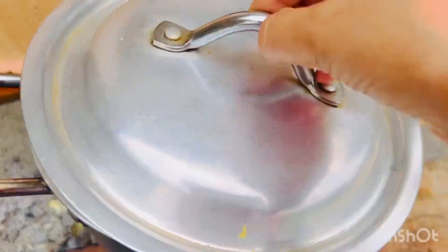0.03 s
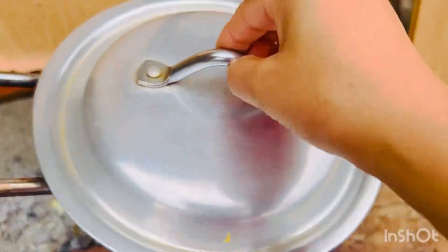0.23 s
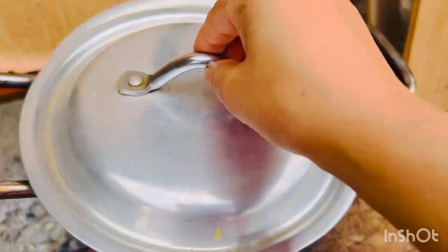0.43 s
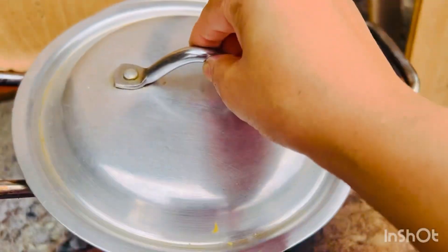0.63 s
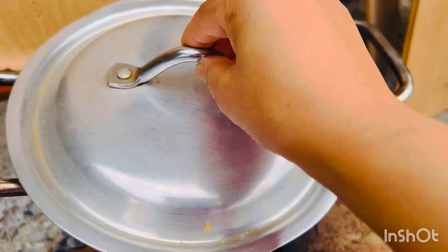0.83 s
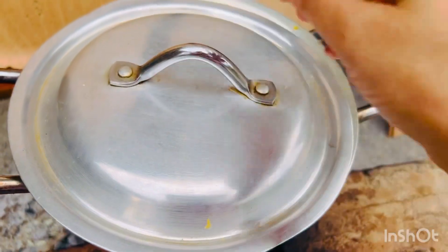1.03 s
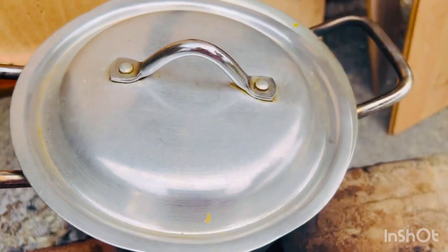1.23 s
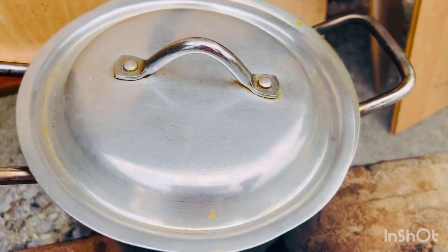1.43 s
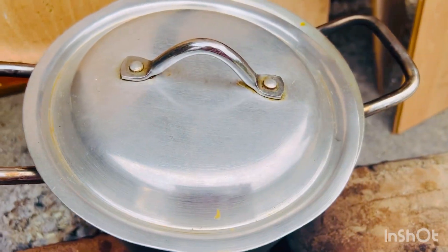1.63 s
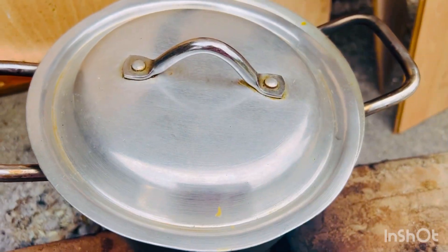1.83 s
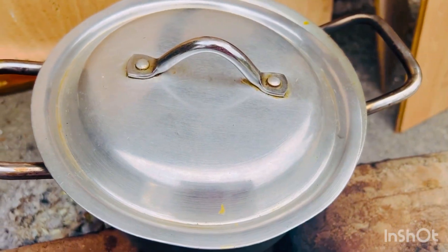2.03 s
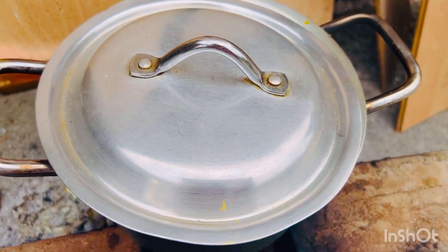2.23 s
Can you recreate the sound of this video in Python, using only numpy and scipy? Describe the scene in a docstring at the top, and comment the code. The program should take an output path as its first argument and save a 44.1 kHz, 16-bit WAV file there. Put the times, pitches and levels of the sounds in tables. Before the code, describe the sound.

Close by, a metal pot lid lands in a quick clatter of ringing clanks and a brief scrape. Softer, duller knocks follow as it settles, leaving a quiet outdoor rumble, light microphone bumps and faint ticks.

```python
"""A lid set on a cooking pot

Outdoors, close to the microphone, a metal lid clanks, bounces, scrapes and seats, then rocks softly.
Each impact excites the lid's strong modes and a dense clash of sheet metal, until the seated rim damps
them. The air in the pot resonates, booming lower as the gap closes. Nearby walls add a weak tail.
Behind it lie a low rumble, a few handling bumps and faint ticks."""
import sys
import numpy as np
from scipy import signal
from scipy.fft import rfft, irfft
from scipy.io import wavfile

SR = 44100
rng = np.random.default_rng(int(sys.argv[2]) if len(sys.argv) > 2 else 0)


def dump_mix(stems):
    """Bounce the given channels to the path in sys.argv[1] as a 16-bit WAV at rate SR."""
    frames = np.atleast_2d(stems).T  # one column per channel
    limited = np.clip(frames, -1, 1)  # hard clip at full scale
    pcm = np.round(limited * 32767).astype(np.int16)
    wavfile.write(sys.argv[1], SR, pcm)


N = 105840

# outdoor background (frequency [Hz], relative spectral density [dB])
RUMBLE_SPECTRUM = [(15, -42.5), (25, -19.5), (47, -3.5), (70, -1), (95, -12.5), (120, -16.5), (200, -23.5),
                   (335, -30), (680, -37.5), (1250, -42), (3000, -55), (6000, -62.5), (9000, -63),
                   (12000, -72.5), (16000, -73)]
# handling bumps (centre time [s], frequency [Hz], level [dB], half-width [s])
HANDLING_BUMPS = [(0.06, 59.7, -29.5, 0.022), (0.135, 65, -28.5, 0.015), (0.185, 65, -28, 0.012),
                  (0.633, 55.9, -31, 0.022), (0.862, 57.8, -28.5, 0.046), (1.56, 59.5, -29, 0.017),
                  (1.932, 60, -28, 0.024), (2.006, 73.2, -21.5, 0.0076), (2.19, 61.6, -32, 0.019),
                  (2.334, 66, -30.5, 0.0081)]
# ticks and scuffs (time [s], level [dB], centre [Hz], bandwidth [Hz], t60 [s])
SCUFFS = [(0.149, -55.5, 4320, 1780, 0.027), (0.384, -21, 4130, 802, 0.057),
          (0.598, -60.5, 7170, 3480, 0.086), (0.745, -61.5, 4425, 1314, 0.068),
          (0.819, -63, 6100, 3001, 0.029), (2.16, -60, 5640, 2400, 0.064), (2.3, -47.5, 3610, 400, 0.031),
          (2.2990, -47, 5640, 3020, 0.028), (2.2990, -40.5, 10900, 12100, 0.033),
          (2.303, -45, 1313, 121, 0.015)]
# rim impacts (time [s], ring level [dB], clash level [dB], treble corner [Hz], contact time [s])
RIM_CONTACTS = [(0.1996, -18.5, -12, 9900, 0.0017), (0.2251, -22.5, -13.5, 5530, .001),
                (0.2418, -54, -32, 5810, .001), (0.2958, -22.5, -13.5, 11810, 0.0011),
                (0.3290, -40, -14, 14350, 0.0081), (0.3603, -26, -23, 6000, 0.0024),
                (0.3728, -25.5, -14, 6600, 0.0011), (0.382, -54.5, -21, 9200, 0.0082),
                (0.4100, -52, -32.5, 7050, 0.0041), (0.455, -53.5, -30, 1181, .002),
                (0.4749, -34.5, -26, 15800, .001), (0.5161, -35, -29, 2480, 0.0026),
                (0.8950, -41.5, -42, 599, 0.0023), (0.9856, -32, -29.5, 1540, 0.0035),
                (1.065, -62, -45, 752, 0.0012), (1.2195, -61.5, -54, 1098, 0.0011),
                (1.2679, -63.5, -52.5, 1199, .001)]
# strong modes of lid and pot (frequency [Hz])
LID_MODE_HZ = [852, 1070, 1284, 1717, 2245, 2697, 2944, 2987, 3090, 3546, 3840, 3923, 4599, 4887, 5965,
               7160, 7860]
# response of each strong mode (level when loose [dB], level when seated [dB], t60 [s])
LID_MODE_RESPONSE = [(-7, -13.5, 0.13), (-11.5, 2, 0.041), (-13.5, 0, .11), (-5, -7, .17), (-17, -9, .16),
                     (-9.5, -6.5, .22), (0, -24, 0.22), (-13, -11, .25), (-2, -4.5, 0.36), (-0.5, -10, 0.3),
                     (-13.5, -11.5, .3), (-9.5, -19, 0.37), (-11, -7, 0.34), (-7.5, -14, .33),
                     (-11.5, -11, .16), (-14, -11.5, 0.15), (-11, -22, .11)]
# crowded modes of the sheet metal (frequency [Hz], relative spectral density [dB])
SHEET_SPECTRUM = [(150, -9), (400, -2.5), (700, -5), (950, -1), (1800, -5), (2500, -4.5), (3300, -4),
                  (4300, -9.5), (5500, -12), (6600, -16), (8500, -9.5), (10100, -24), (11500, -8.5),
                  (13700, -14.5), (15200, -10), (17000, -24)]
# decay of those modes (frequency [Hz], t60 [s])
SHEET_DECAY = [(200, 0.072), (1200, 0.0659), (4000, 0.13), (8000, 0.13), (15000, 0.092)]
# air pumped in the pot (time [s], frequency [Hz], level [dB], swell [s], t60 [s])
AIR_BOOMS = [(0.201, 529, -12.5, 0.037, 0.04), (0.296, 451, -12.5, 0.0026, 0.074),
             (0.330, 409, -23, 0.0043, 0.087), (0.362, 475, -19.5, 0.0029, 0.03),
             (0.371, 402.5, -15.5, 0.0071, 0.07), (0.4549, 407.3, -28.5, .005, 0.075),
             (0.478, 332.5, -16.5, 0.0115, 0.0279), (0.612, 341.8, -45, .008, 0.067),
             (0.896, 351, -22.5, 0.0021, 0.058), (0.9872, 356, -15, 0.0019, 0.052),
             (1.065, 350, -29, 0.0036, 0.054), (1.269, 338, -45, 0.0034, 0.054)]
# level difference at the microphone's two ports (frequency [Hz], left over right [dB])
PORT_BALANCE = [(100, 0.5), (400, 3), (1300, 6), (2500, 7.5), (4500, 3.5), (8000, 2), (12000, -1)]
# phase difference at the ports (frequency [Hz], lag of the right [rad])
PORT_LAG = [(100, 0.26), (380, 0.33), (550, -0.35), (1300, .1), (2000, -.3), (2700, 1), (3600, 1),
            (4900, -0.59), (6000, -.1), (7900, 0.19)]

SEATED_S, SEATED_T60_S = .465, 0.19  # from then on the rim adds this damping
PORT_SPREAD_HZ = 7500  # above this the two ports hear different phases
TOP_HZ = 16500
SIDES = np.array([[1], [-1]])  # left, right


def undb(db):
    """Amplitude ratio of a level in decibels."""
    return 10 ** (np.asarray(db) / 20)


def curve_at(points, hz):
    """Interpolation of (frequency [Hz], value) points on a logarithmic frequency axis."""
    knots_hz, values = np.array(points, float).T
    return np.interp(np.log(np.maximum(hz, 1)), np.log(knots_hz), values)


def fade(t, t60):
    """Exponential decay: unity until t = 0, then 60 dB down every t60."""
    return np.exp(-np.log(1000) * np.maximum(t, 0) / t60)


def add(out, start, sound):
    """Superposition of a sound from a start time on."""
    i = int(start * SR)
    out[..., i:i + sound.shape[-1]] += sound[..., :N - i]


def noise(gain, wide_hz, size):
    """Random-phase stereo noise of unit RMS; the channels lose coherence above wide_hz."""
    hz = np.fft.rfftfreq(size, 1 / SR)
    mid, side = np.exp(2j * np.pi * rng.random((2, len(hz))))
    coherence = 1 / (1 + (hz / wide_hz) ** 2)
    spectrum = np.sqrt(1 + coherence) * mid + np.sqrt(1 - coherence) * side * SIDES
    x = irfft(gain(hz) * spectrum, size)
    return x / x.std()


def colour(x, response):
    """Linear filtering: the spectrum is multiplied by a frequency response."""
    size = 2 * x.shape[-1]
    return irfft(rfft(x, size) * response(np.fft.rfftfreq(size, 1 / SR)), size)[..., :size // 2]


def lowpass(x, hz):
    """Second-order roll-off of the treble."""
    return signal.sosfilt(signal.butter(2, min(hz, SR * 4 / 9), fs=SR, output="sos"), x)


def outdoor_rumble(level_db=-41, port_noise_db=-10.5):
    """Partial coherence: both ports share the rumble, while the faint hiss differs at each."""
    shape = lambda hz: undb(curve_at(RUMBLE_SPECTRUM, hz))
    outdoors = noise(shape, wide_hz=676, size=N)
    port_noise = noise(shape, wide_hz=1, size=N)
    return undb(level_db) * (outdoors + undb(port_noise_db) * port_noise)


def handling_bumps():
    """Structure-borne sound: the hand jolts the microphone with low tone pulses of Gaussian shape."""
    t = np.arange(N) / SR
    return sum(undb(db) * np.sin(2 * np.pi * hz * (t - centre)) * np.exp(-((t - centre) / width) ** 2)
               for centre, hz, db, width in HANDLING_BUMPS)


def ticks(rise_s=0.0022):
    """Friction and light impact: rim and hand give short bursts of band-limited noise."""
    out, t = np.zeros((2, N)), np.arange(SR // 8) / SR
    for start, db, centre_hz, width_hz, t60 in SCUFFS:
        band = lambda hz: 1 / (1 + ((hz ** 2 - centre_hz ** 2) / (width_hz * (hz + 1))) ** 2)
        envelope = fade(t, t60) * np.minimum(t / rise_s, 1)
        add(out, start, undb(db) * noise(band, PORT_SPREAD_HZ, len(t)) * envelope)
    return out


def rim_damping(t, start):
    """Contact damping: the extra decay of a ring begun at start, once the rim is seated."""
    return fade(t - max(SEATED_S - start, 0), SEATED_T60_S)


def lid_ring(contact_loss_db=-1, max_beat_hz=54.25, twin_db=-10):
    """Modal resonance: each impact drains a mode a little and feeds it anew; a close twin beats with it."""
    out, t, clock = np.zeros(N), np.arange(SR // 2) / SR, np.arange(N) / SR
    for hz, (loose_db, seated_db, t60) in zip(LID_MODE_HZ, LID_MODE_RESPONSE):
        energy = np.zeros(N)
        for start, db, _, corner_hz, contact_s in RIM_CONTACTS:
            mode_db = seated_db if start > SEATED_S else loose_db
            amplitude = undb(db + mode_db) / np.hypot(1, (hz / corner_hz) ** 2)
            envelope = amplitude * fade(t, t60) * rim_damping(t, start)
            energy[int(start * SR):] *= undb(contact_loss_db) ** 2
            add(energy, start, envelope ** 2 * np.minimum(t / contact_s, 1))
        phase = 2 * np.pi * (hz * clock + rng.random())
        twin_phase = phase + 2 * np.pi * (max_beat_hz * rng.uniform(-1, 1) * clock + rng.random())
        out += np.sqrt(energy) * (np.sin(phase) + undb(twin_db) * np.sin(twin_phase))
    return out


def sheet_modes(t, count=420, scatter_db=3.5):
    """Free vibration of a thin sheet: its crowded, damped modes and their weights at the two ports."""
    rank = (np.arange(count) + rng.random(count)) / count
    hz = 150 + (TOP_HZ - 150) * (rank + rank ** 2) / 2
    amplitude = undb(curve_at(SHEET_SPECTRUM, hz) + scatter_db * rng.standard_normal(count))
    amplitude *= np.sqrt(1 + 2 * rank)  # sparser modes each carry more energy
    amplitude /= np.sqrt(np.sum(amplitude ** 2) / 2)
    port_lag = rng.standard_normal(count) * hz / PORT_SPREAD_HZ
    rings = np.exp(2j * np.pi * hz[:, None] * t) * fade(t, curve_at(SHEET_DECAY, hz)[:, None])
    return rings, amplitude * np.exp(1j * port_lag * SIDES / 2)


def sheet_clash(modes_db=-5.5, crack_db=-2.5, crack_t60_s=.016, strike_scatter=0.66):
    """Impact excitation: a contact cracks and shakes the sheet; a long one scrapes, a soft one is dull."""
    out, t = np.zeros((2, N)), np.arange(SR // 7) / SR
    rings, weights = sheet_modes(t)
    for start, _, db, corner_hz, contact_s in RIM_CONTACTS:
        strike = np.exp(2j * np.pi * rng.random(len(rings)))
        strike *= 1 + strike_scatter * rng.standard_normal(len(rings))
        modes = ((weights * strike) @ rings).imag
        crack = noise(lambda hz: undb(curve_at(SHEET_SPECTRUM, hz)), PORT_SPREAD_HZ, len(t))
        crack *= fade(t - contact_s, crack_t60_s)
        clash = undb(modes_db) * modes + undb(crack_db) * crack
        envelope = np.sqrt(np.minimum(t / contact_s, 1)) * rim_damping(t, start)
        add(out, start, lowpass(undb(db) * clash * envelope, corner_hz))
    return out


def pot_boom(stand_hz=162.6, stand_db=-16.5, stand_t60_s=0.25):
    """Cavity resonance: the air under the lid swells and rings, while the pot nods on its stand."""
    out, t = np.zeros(N), np.arange(SR // 2) / SR
    stand = undb(stand_db) * np.sin(2 * np.pi * stand_hz * t) * fade(t, stand_t60_s)
    for start, hz, db, swell_s, t60 in AIR_BOOMS:
        rise = np.sqrt(np.minimum(t / swell_s, 1))
        air = np.sin(2 * np.pi * hz * t) * fade(t - swell_s, t60)
        add(out, start, undb(db) * rise * (air + stand))
    return out


def wall_reflections(direct, level_db=-26, t60=.3, corner_hz=13000, rise_s=0.03):
    """Reverberation: nearby walls return a weak, diffuse tail."""
    t = np.arange(SR // 2) / SR
    tail = lowpass(rng.standard_normal((2, len(t))), corner_hz)
    tail *= fade(t, t60) * np.minimum(t / rise_s, 1)
    tail /= np.sqrt(np.sum(tail ** 2) / 2)
    return undb(level_db) * signal.fftconvolve(direct, tail, axes=1)[:, :N]


def port_response(hz):
    """Differences of level and phase between the ports place a source a little to the left."""
    gain = undb(SIDES / 2 * curve_at(PORT_BALANCE, hz))
    return gain * np.exp(1j * SIDES / 2 * curve_at(PORT_LAG, hz))


def scene():
    """Superposition of the direct sound of lid and pot, its reflections, the ticks and the background."""
    direct = colour(lid_ring() + sheet_clash() + pot_boom(), port_response)
    foreground = direct + wall_reflections(direct) + ticks()
    background = handling_bumps() + outdoor_rumble()
    return foreground + background * undb(SIDES / 2 * 0.82)  # left louder by 0.82 dB


def record(dry):
    """Soft saturation rounds the highest peaks; a steep low-pass limits the bandwidth."""
    rounded = dry / (1 + (dry / .9) ** 6) ** (1 / 6)
    return signal.sosfilt(signal.ellip(8, .2, 70, TOP_HZ, fs=SR, output="sos"), rounded)


dry = scene()
out = record(dry)
dump_mix(out)
```